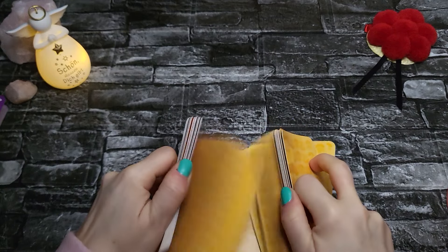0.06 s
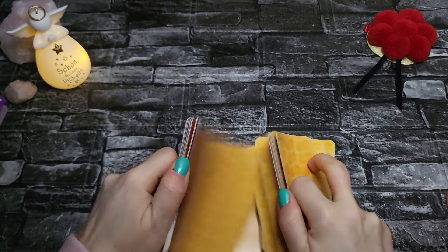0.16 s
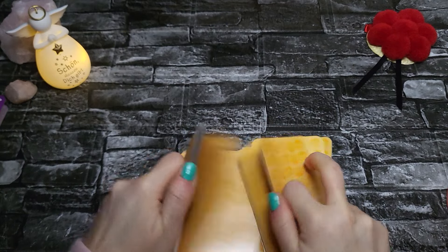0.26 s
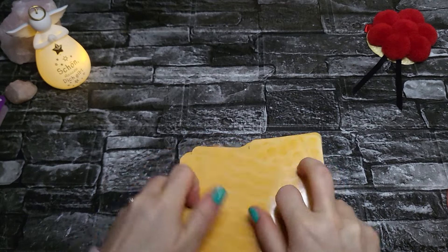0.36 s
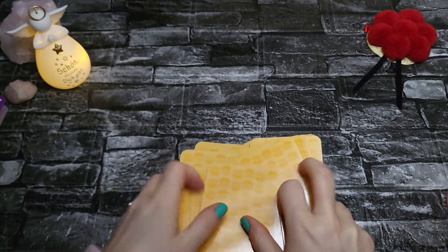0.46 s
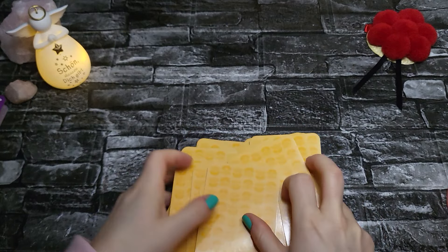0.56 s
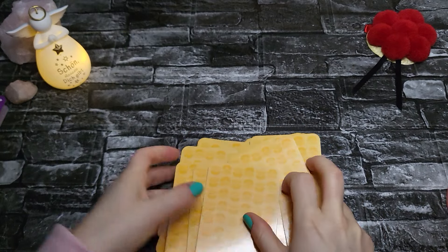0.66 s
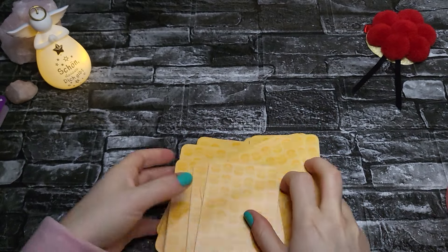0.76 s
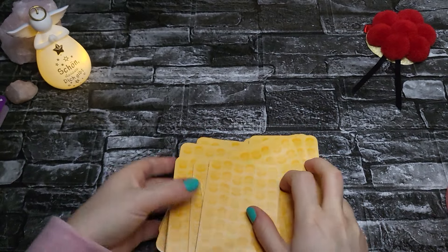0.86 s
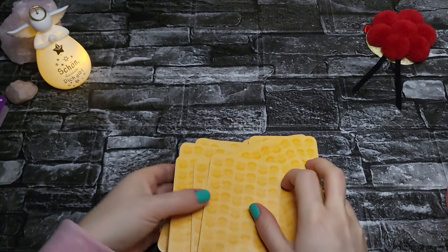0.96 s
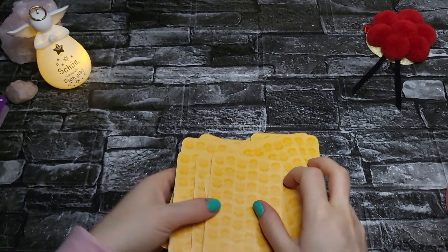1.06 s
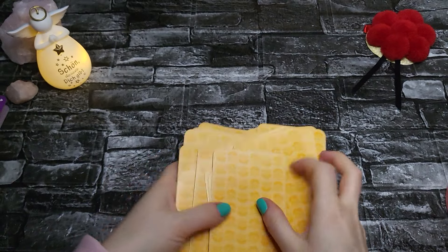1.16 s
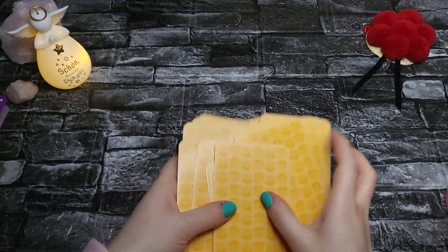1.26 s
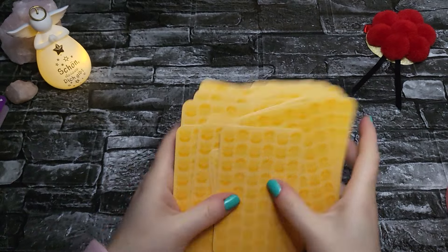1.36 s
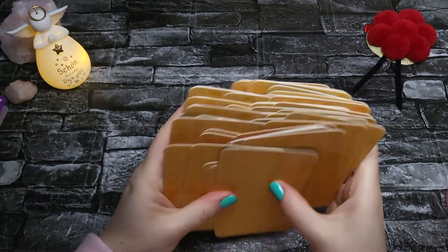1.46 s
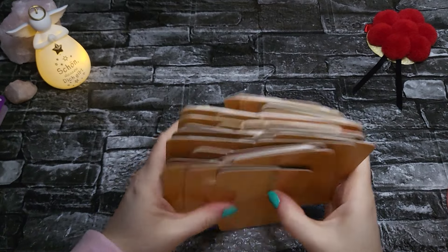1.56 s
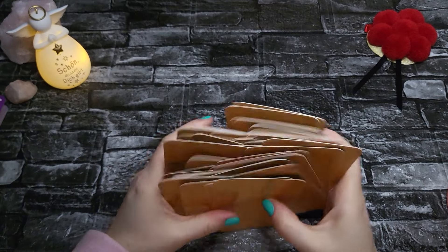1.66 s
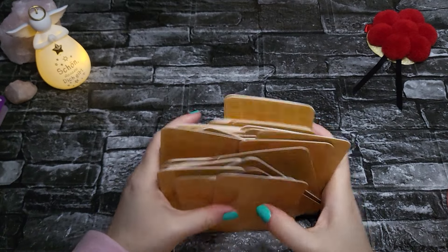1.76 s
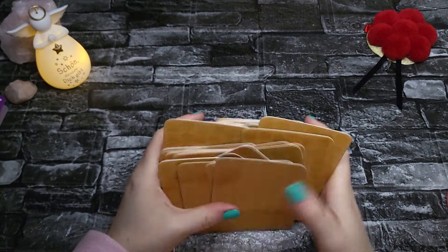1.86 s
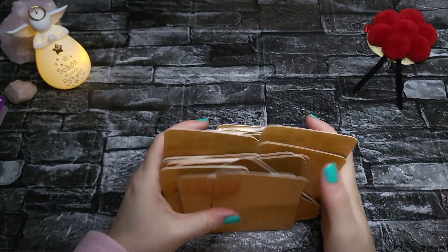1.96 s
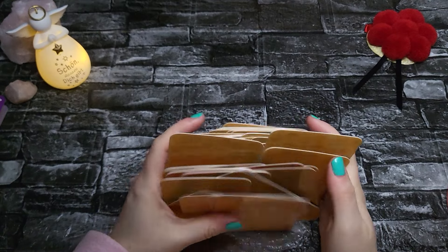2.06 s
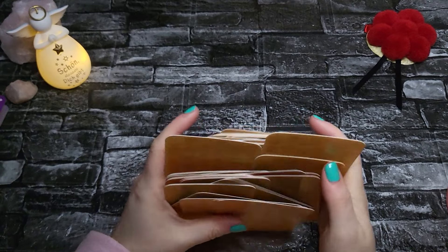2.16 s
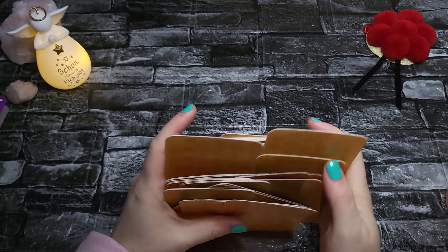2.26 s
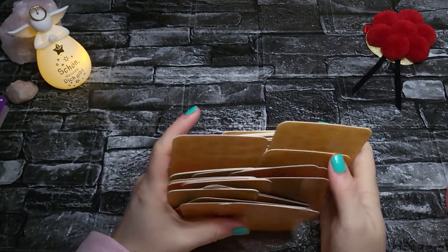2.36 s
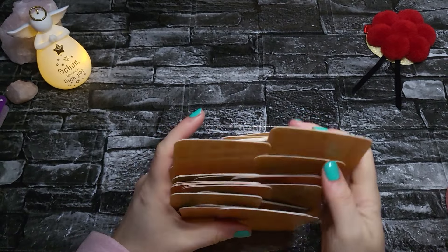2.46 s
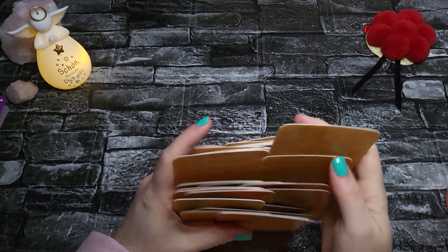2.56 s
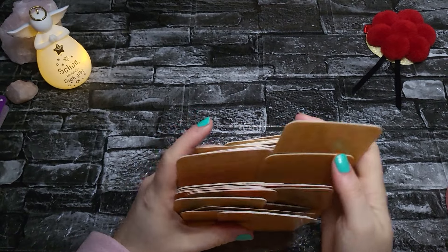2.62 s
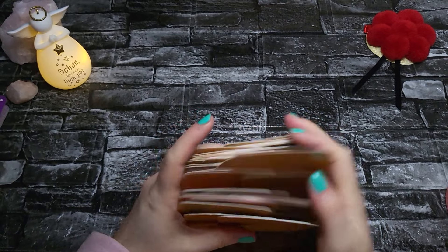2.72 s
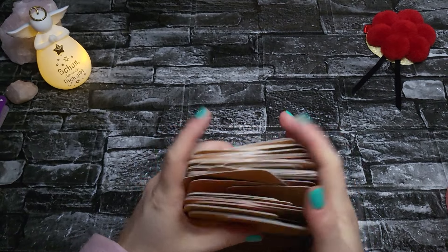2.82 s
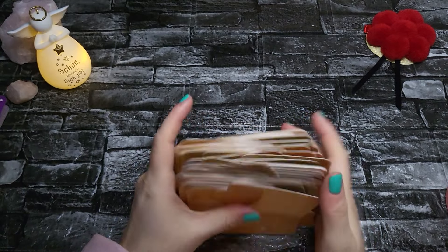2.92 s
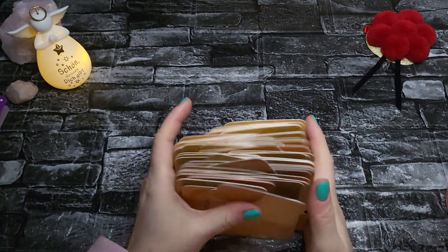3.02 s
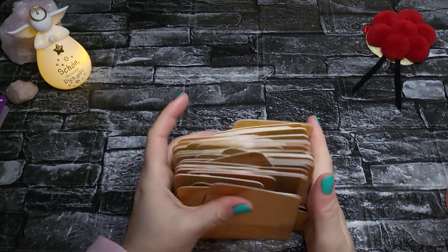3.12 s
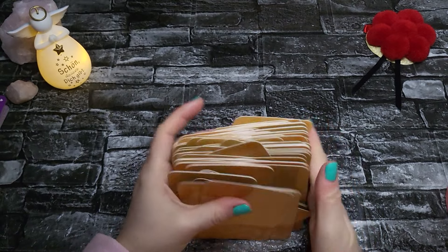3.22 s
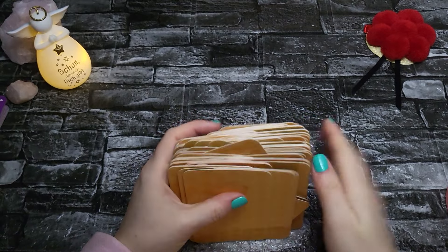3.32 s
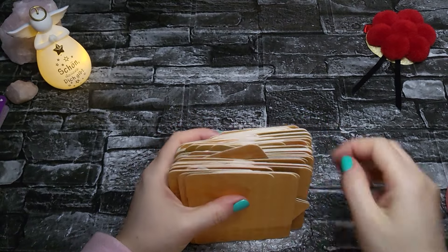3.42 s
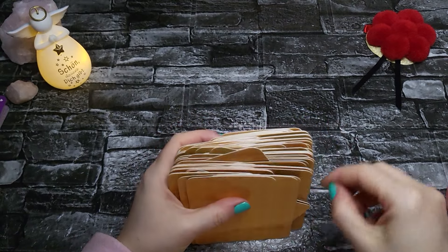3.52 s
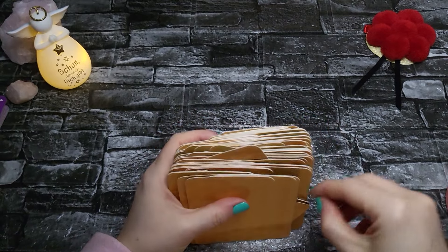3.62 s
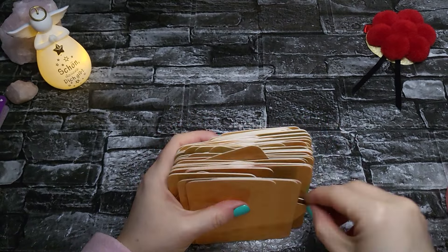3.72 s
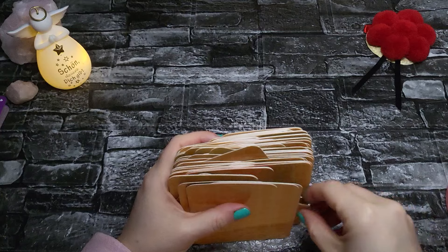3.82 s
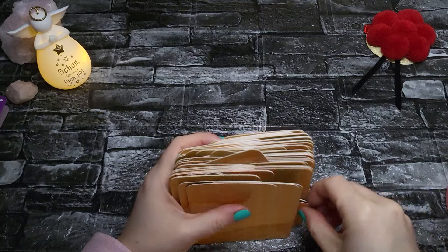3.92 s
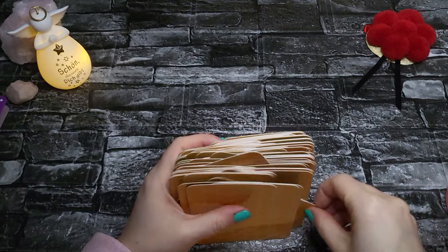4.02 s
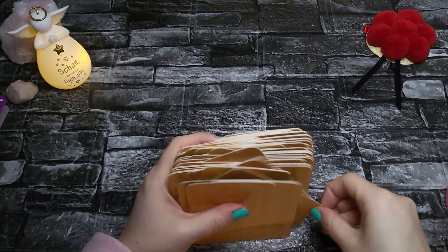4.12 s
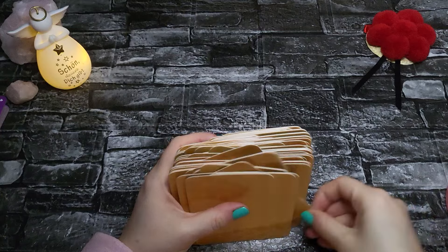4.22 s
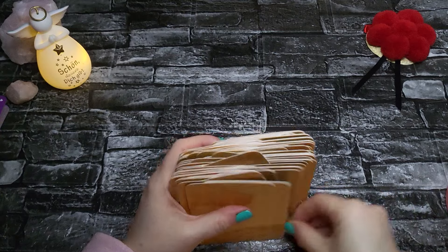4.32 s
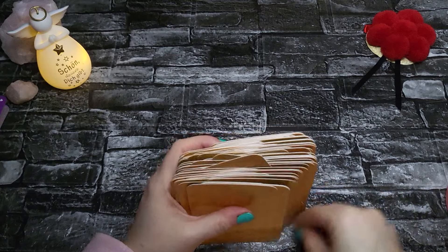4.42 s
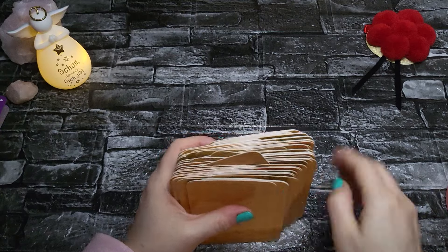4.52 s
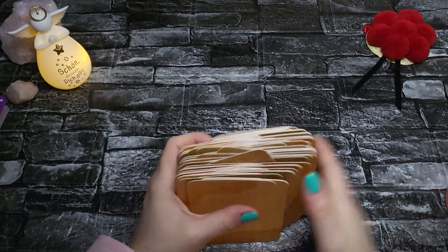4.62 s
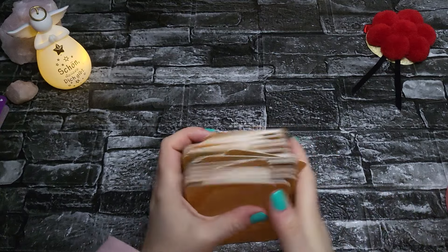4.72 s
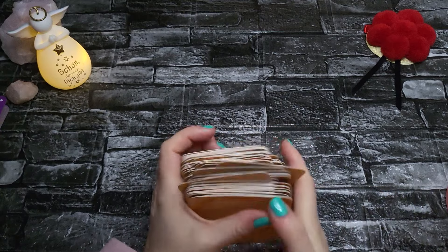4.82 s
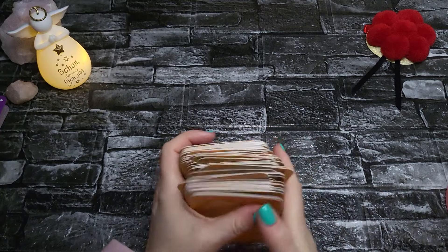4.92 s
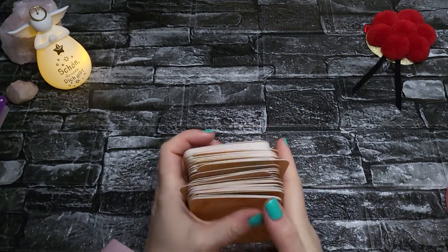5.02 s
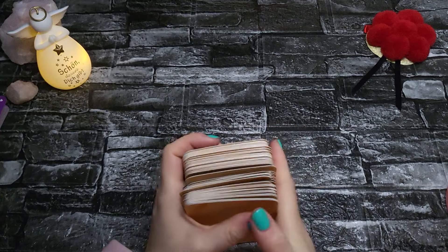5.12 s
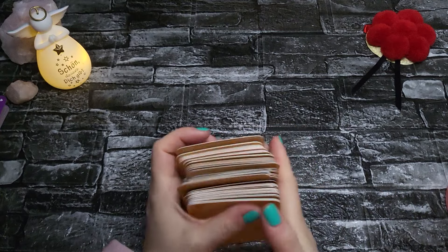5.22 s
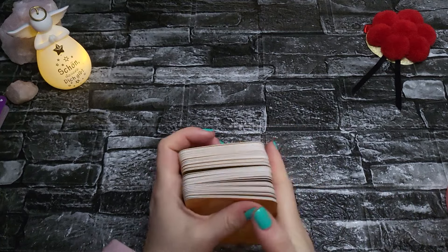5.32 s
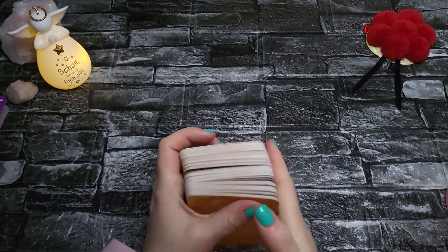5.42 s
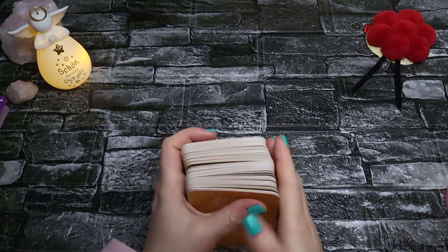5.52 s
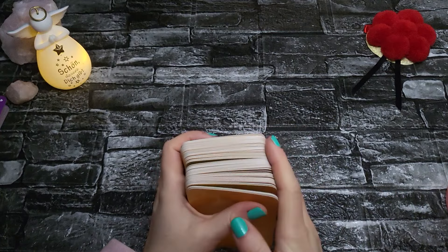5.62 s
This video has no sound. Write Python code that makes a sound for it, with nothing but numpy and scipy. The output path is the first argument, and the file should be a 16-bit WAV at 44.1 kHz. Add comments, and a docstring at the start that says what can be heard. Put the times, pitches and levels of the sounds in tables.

```python
"""A clattering riffle: two halves of a deck of large stiff cards fall together on a table, close up.
Hands then lift, slide and square the deck, with flicked edges, hiss, rumble, knocks, pops and faint squeaks.
Slaps and flicks are clumps of noise cracks with a blurred pitch; the hiss is grainy coloured noise.
Noise pushes ring the table's modes; pops and squeaks are resonated noise; echoes and room air surround it."""
import sys
import numpy as np
from scipy import signal
from scipy.io import wavfile
from scipy.ndimage import uniform_filter1d

SR = 44100
rng = np.random.default_rng(int(sys.argv[2]) if len(sys.argv) > 2 else 0)


def to_wav(sig):
    """Store sig (one row per channel, or 1-D mono) as 16-bit WAV at the path in sys.argv[1].

    Samples outside -1..1 are clipped; the rate is SR.
    """
    pcm = np.clip(np.atleast_2d(sig), -1, 1) * 32767
    pcm = np.round(pcm).astype(np.int16)
    wavfile.write(sys.argv[1], SR, pcm.T)  # frames by channels


N = 250443  # samples

# Cards slapping onto the pile: start_s, peak_db, pitch_hz
SLAPS = [(0.0158, -9.5, 2480), (0.0221, -11, 2500), (0.0416, -12.5, 4110), (0.066, -12.5, 6500),
         (0.0758, -11, 2067), (0.0894, -4, 2340), (0.093, -5, 2350), (0.1086, -12.5, 4750),
         (0.1256, -8, 7570), (0.133, -14.5, 2000), (0.1474, -7.5, 3520), (0.1603, -15, 2665),
         (0.1706, 0.5, 2414), (0.1747, -2.5, 1670), (0.188, -3.5, 2336), (0.1984, -11, 4260),
         (0.2117, -10, 2410), (0.2175, -10, 8000), (0.222, -1.5, 2400), (0.2365, -1, 2260),
         (0.2492, -7, 2200), (0.268, -2.5, 3290), (0.281, -11, 5000), (0.2875, -2, 3600), (0.297, -6, 4000),
         (0.3044, -3.5, 6680), (0.31, -6.5, 2550), (0.316, -11, 4210), (0.3333, -3, 2627),
         (0.3427, -5, 1440), (0.3504, -4.5, 1570), (0.3597, -4.5, 1930), (0.365, -4, 3437),
         (0.3899, -13, 3520), (0.3942, -11.5, 3620), (0.403, -21, 4000)]
# Runs of lighter cards: start_s, end_s, mean_peak_db, centre_pitch_hz, pitch_spread_octaves
LIGHT_RUNS = [(.003, .375, -15.5, 5500, 1.4), (1.665, 1.8, -28.5, 3400, .4)]
# Card edges flicking free: start_s, peak_db, pitch_hz, decay_ms
EDGE_FLICKS = [(0.438, -26.5, 2750, 2), (0.464, -31.5, 1920, 3), (0.6379, -33.5, 2930, 2.4),
               (0.813, -19.5, 2300, 1.4), (0.8463, -27.5, 1600, 2.7), (0.884, -36.5, 2680, 9.6),
               (1.27, -29.5, 2470, 7.1), (1.4419, -25.5, 4400, 4), (1.4707, -33, 2830, 2.4),
               (1.5276, -23.5, 3070, 4), (1.5518, -31, 6330, 3.5), (1.5664, -32, 1670, 3.2),
               (1.599, -26, 6060, 1.4), (1.646, -28, 2880, 5.5), (1.674, -30, 3400, 1.7),
               (1.6904, -21, 3340, 1.6), (1.707, -32, 2900, 2.5), (1.724, -26, 3480, 3),
               (1.7354, -24, 2420, 2.8), (1.7676, -35, 3100, 5.1), (1.817, -28, 3680, 2.6),
               (1.831, -30, 5460, 5.1), (1.8948, -26, 3180, 6), (2.121, -46, 3480, 2.2),
               (2.133, -39.5, 4000, 2.1), (2.344, -38.5, 1900, 3), (2.355, -35, 6100, 3.7),
               (2.476, -38, 1390, 2.3), (2.5604, -26, 6500, 1.6), (2.974, -36, 3400, 4.6),
               (3.186, -37.5, 2980, 13), (3.845, -50.5, 3000, 7.5), (4.156, -37, 3710, 5.9),
               (4.188, -39, 3220, 3.5), (4.315, -32.5, 3200, 1.4), (4.44, -36.5, 3830, 3.9),
               (4.4614, -36.5, 3700, 2.5), (4.699, -34, 3350, 5.6), (4.9155, -28, 2830, 0.87),
               (4.9216, -32.5, 3080, 1.4), (5.0798, -30, 3800, 6.9), (5.0914, -26, 2510, 4.1),
               (5.263, -24, 3500, 4.7), (5.272, -27, 2560, 6), (5.303, -20.5, 3200, 8.9),
               (5.3099, -13.5, 3600, 5.9), (5.326, -22, 2820, 7.4), (5.449, -31.5, 2740, 3.3),
               (5.484, -36.5, 2540, 1.6)]
# Colour of a slap or flick, relative: frequency_hz, level_db
SLAP_COLOUR = [(350, -28), (600, -6.5), (1570, -2), (2370, -1), (2760, -3.5), (7620, -3), (12800, -15),
               (16000, -29.5)]
# Colour of the sliding card faces, relative: frequency_hz, level_db
SLIDE_COLOUR = [(290, -25.5), (500, -0.5), (553, -3.5), (1110, -1), (1510, 1.5), (8330, -0.5), (13400, -17),
                (16000, -24.5)]
# Air between two bowed cards: centre_hz, width_hz, level_db (mean, relative to the hiss)
CARD_GAP = (2965, 1500, -15)
# Moves of the hands: top_s, rise_s (before the lead factor), fall_s (before any linger),
# hiss_db, slow_table_shaking_db, quick_table_shaking_db
HAND_MOVES = [(.33, 1, 0.085, -31.5, -61, -36), (.42, 0.046, 0.16, -46.5, -51.5, -48.5),
              (0.885, 0.14, 0.12, -55, -57, -71), (1.081, 0.2, 0.076, -57.5, -60, -90),
              (1.214, 0.11, 0.045, -54, -61, -57.5), (1.29, 0.0071, 0.071, -51, -64, -53.5),
              (1.39, 0.073, 0.052, -49, -48, -66), (1.482, 0.048, 0.044, -44, -54, -49.5),
              (1.601, 0.028, 0.046, -41, -66, -64), (1.681, 0.12, 0.072, -44, -40.5, -42.5),
              (1.745, 0.1, 0.062, -44.5, -30.5, -41), (1.898, 0.4, 0.099, -50.5, -50, -50.5),
              (2.137, 0.1, 0.13, -52.5, -75, -59.5), (2.355, 0.046, 0.11, -50, -53.5, -55.5),
              (2.568, 0.13, 0.059, -52, -50.5, -60), (2.81, 0.21, 0.11, -49, -57, -58),
              (2.99, 0.014, 0.12, -51.5, -48, -50), (3.06, 0.21, 0.062, -48.5, -67, -56),
              (3.33, 0.37, 0.11, -55, -53, -63), (3.53, 0.3, 0.081, -51.5, -88, -58),
              (4.191, 0.094, 0.13, -59, -68, -66.5), (4.328, 0.057, 0.16, -48.5, -51.5, -52),
              (4.716, 0.031, 0.094, -42, -47.5, -58.5), (4.801, 0.15, 0.057, -43.5, -50, -56.5),
              (4.93, 0.19, 0.24, -49.5, -50, -52.5), (5.09, 0.073, 0.086, -51, -77, -48),
              (5.268, 0.034, 0.022, -41, -57, -43), (5.313, 0.024, 0.035, -36.5, -27, -29),
              (5.454, 0.46, 0.083, -54.5, -48, -49.5)]
# Hands holding still: hiss_db, slow_table_shaking_db, quick_table_shaking_db
REST_LEVELS = (-68.5, -71.5, -72)
# Modes of the table top: frequency_hz, width_hz, drive_db
TABLE_MODES = [(56.4, 17, -5.5), (116, 41, -14), (157.6, 47, -14), (259, 48, -15.5), (318, 54.6, -14),
               (425, 62, -12.5), (512.5, 64, -16.5), (755, 370, -25)]
# The deck knocking on the table: start_s, peak_db
DECK_KNOCKS = [(0.842, -41), (1.625, -33.5), (1.673, -32), (1.699, -29), (1.735, -30.5), (2.358, -37.5),
               (2.556, -36), (4.313, -41.5), (4.915, -57), (5.259, -28.5), (5.272, -25.5), (5.305, -22.5),
               (5.324, -24)]
# A hollow scrape and pop inside the loose deck: start_s, peak_db, decay_ms
DECK_POPS = [(2.196, -42, 18), (2.224, -48, 4.4), (2.2357, -29.5, 1.4)]
# Resonances of the hollow deck: frequency_hz, width_hz, drive_db
HOLLOW_MODES = [(616, 210, 14), (924, 470, 18.5), (1570, 190, -4), (2910, 400, 4)]
# Rubbing tones while the deck is squared: start_s, end_s, pitch_hz, level_db
RUBBING_TONES = [(5.003, 5.206, 1320, -60), (5.333, 5.45, 1443, -58)]
# Decay of the echoes: frequency_hz, t60_s
ROOM_DECAY = [(200, 0.18), (1000, 0.11), (4000, 0.12), (12000, 0.12)]
# Colour of the still air, relative: frequency_hz, level_db
AIR_COLOUR = [(15, -12.5), (25, 10.5), (66, 5), (285, -6), (354, 0.5), (575, -19), (1190, -26), (3920, 0.5),
              (9570, -4.5), (16000, -30)]

AIR_DB = -67
FLICK_TOP = 9  # a flick is dull above this multiple of its pitch, or above SR / 4 if that is lower
SWELL_DB = 15  # drop away from a move's top per scaled rise or fall time, before rounding
ROUNDING = 0.15  # how much the top of a move is flattened
HISS_LEAD, TABLE_LEAD = 0.69, 0.86  # factors on the rise time: the table takes up a move more slowly
TABLE_LINGER_S = 0.016  # the table shakes on after a move
BAND_EDGE_HZ = 15900


def gain_of(db):
    """Turns decibels into an amplitude factor."""
    return 10 ** (np.asarray(db) / 20)


def evened(x):
    """Scales to rms 1."""
    return x / np.sqrt(np.mean(x ** 2) + 1e-20)


def peaked(db, x):
    """Scales to a peak level."""
    return gain_of(db) * x / abs(x).max()


def read(points, hz):
    """Reads a curve of points on a log-frequency axis."""
    f, value = np.transpose(points)
    return np.interp(np.log(hz + 1), np.log(f + 1), value)


def add(mix, s, sound):
    """Lays a sound into the mix at s seconds."""
    part = mix[round(s * SR):][:len(sound)]
    part += sound[:len(part)]


def coloured(x, points):
    """Shapes a sound with a causal minimum-phase filter of the given spectrum."""
    level_db = np.maximum(read(points, abs(np.fft.fftfreq(4096, 1 / SR))), -100)
    log_gain = np.log(gain_of(level_db))
    # the Hilbert transform of the log gain supplies the phase
    spectrum = np.exp(np.conj(signal.hilbert(log_gain)))
    taps = np.fft.ifft(spectrum).real[:2048]
    return signal.oaconvolve(x, taps)[:len(x)]


def resonate(x, hz, width):
    """Rings one decaying resonance with a peak gain of about 1."""
    pole = np.exp((2j * np.pi * hz - np.pi * width) / SR)
    return 2 * signal.lfilter([1 - abs(pole)], [1, -pole], x).real


def wander(seconds):
    """Drifts at random with rms 1, changing over the given time."""
    size = max(int(seconds * SR), 2)
    once = uniform_filter1d(rng.standard_normal(N), size=size)
    return evened(uniform_filter1d(once, size=size))


def cracks(ms, rise_ms):
    """A clump of tiny cracks as a card lands or slips along its edge."""
    t_ms = np.arange(2600) / SR * 1000
    sizes = gain_of(3.98 * rng.exponential(1, len(t_ms)).clip(0, 4))
    swell = (1 - np.exp(-t_ms / rise_ms)) * np.exp(-t_ms / ms)
    return rng.standard_normal(len(t_ms)) * sizes * swell


def snap(db, hz, drive, ring_db, blur):
    """Cracks take the colour of the card; the trapped air adds a blurred pitch."""
    ring = resonate(resonate(drive, hz, blur * hz), hz, blur * hz)
    crack = evened(coloured(drive, SLAP_COLOUR))
    return peaked(db, crack + gain_of(ring_db) * evened(ring))


def table_top(push):
    """The table rings with the same modes for every push; neighbouring modes swing in opposite phase."""
    out = 0
    for k, (hz, width, db) in enumerate(TABLE_MODES):
        broad = resonate(push, hz, 4.5 * width)
        out = out + (-1) ** k * gain_of(db) * resonate(broad, hz, width)
    return out


def blow(db):
    """A rough push, a few milliseconds long, sets the table ringing."""
    t = np.arange(9000) / SR
    push = rng.standard_normal(len(t)) * np.exp(-t / 0.0045)
    # the push is thinned below 150 Hz, so a knock has little deep boom
    thinned = signal.lfilter(*signal.butter(2, 150, "high", fs=SR), push)
    return peaked(db, table_top(thinned))


def moved(column, lead=HISS_LEAD, linger_s=0.):
    """Level of one layer over time: the moves add in power over the resting hands."""
    t = np.arange(0, N + 64, 64) / SR
    top, rise, fall, *levels_db = np.transpose(HAND_MOVES)[:, :, None]
    away = np.maximum((top - t) / (rise * lead), (t - top) / (fall + linger_s))
    away = away ** 2 / (away + ROUNDING)
    moves = gain_of(levels_db[column] - SWELL_DB * away)
    power = (moves ** 2).sum(0) + gain_of(REST_LEVELS[column]) ** 2
    return np.interp(np.arange(N) / SR, t, np.sqrt(power))


def light_run(start, end, db, hz, octaves, count=26):
    """Lighter cards fall unevenly spaced, each with its own strength and pitch."""
    chance = rng.random((count, 3))
    s = start + (end - start) * (np.arange(count) + chance[:, 0]) / count
    peak_db = db + 8.0 * (chance[:, 1] - .5)
    pitch_hz = hz * 2 ** (octaves * (chance[:, 2] - .5))
    return [(*card, 1.1) for card in zip(s, peak_db, pitch_hz)]  # decay 1.1 ms


def flicks():
    """Light cards and card edges crack, dulled in step with their pitch."""
    out = np.zeros(N)
    rows = list(EDGE_FLICKS)
    for run in LIGHT_RUNS:
        rows += light_run(*run)
    for s, db, hz, ms in rows:
        dull = signal.butter(2, min(FLICK_TOP * hz, SR / 4), fs=SR)
        drive = signal.lfilter(*dull, cracks(ms, rise_ms=.35))
        add(out, s, snap(db, hz, drive, ring_db=3.5, blur=.6))
    return out


def slaps():
    """Each card cracks as it lands on the pile and knocks the table below."""
    out = np.zeros(N)
    for s, db, hz in SLAPS:
        add(out, s, snap(db, hz, cracks(2.5, rise_ms=.45), ring_db=-4, blur=.3))
        add(out, s, blow(db - 14.5))
    return out


def sliding():
    """Card faces slip in fine grains and stutter; the gap between cards opens and shuts."""
    grains = rng.standard_normal(N) * gain_of(2.4 * rng.exponential(1, N).clip(0, 5))
    grains *= gain_of(2.0 * wander(.004) + 1.1 * wander(.012))
    hz, width, gap_db = CARD_GAP
    ring = resonate(resonate(grains, hz, width), hz, width)
    gap = evened(ring) * gain_of(gap_db + 3.0 * wander(0.057))
    # small edges catch now and then, about 70 a second: short puffs of cracks
    catches = (rng.random(N) < 70 / SR) * gain_of(4.0 * rng.exponential(1, N).clip(0, 3))
    puff_level = signal.lfilter([1], [1, -np.exp(-1 / (.0012 * SR))], catches)
    puffs = puff_level * rng.standard_normal(N)
    ticks = gain_of(-15.0) * evened(coloured(puffs, SLAP_COLOUR))
    return moved(column=0) * (evened(coloured(grains, SLIDE_COLOUR)) + gap + ticks)


def table():
    """Hands and deck shake the top in lumps, slowly and quickly; the knocks ring over that."""
    lumps = rng.standard_normal(N) * gain_of(2.8 * wander(.008))
    out = np.zeros(N)
    for column, kind in ((1, "low"), (2, "high")):
        split = signal.butter(4, 190, kind, fs=SR, output="sos")
        push = signal.sosfilt(split, lumps)
        level = moved(column, TABLE_LEAD, TABLE_LINGER_S)
        out += table_top(level * push) / np.std(table_top(push))
    for s, db in DECK_KNOCKS:
        add(out, s, blow(db))
    return out


def pops():
    """Cracks excite the hollow resonances inside the loose deck."""
    out = np.zeros(N)
    for s, db, ms in DECK_POPS:
        drive = cracks(ms, rise_ms=0.17)
        hollow = 0
        for hz, width, mode_db in HOLLOW_MODES:
            hollow = hollow + gain_of(mode_db) * resonate(resonate(drive, hz, width), hz, width)
        add(out, s, peaked(db, hollow))
    return out


def squeak():
    """Uneven slips rub through one narrow resonance at a time."""
    slips = rng.standard_normal(N) * gain_of(3.0 * wander(.015))
    out = np.zeros(N)
    for start, end, hz, db in RUBBING_TONES:
        progress = np.clip((np.arange(N) / SR - start) / (end - start), 0, 1)
        # the floor at zero keeps the root real
        arch = np.maximum(np.sin(np.pi * progress), 0) ** .5
        tone = resonate(resonate(slips, hz, 110), hz, 110)
        out += gain_of(db) * arch * evened(tone)
    return out


def room(x):
    """Sparse echoes of random sign, each band dying at its own speed."""
    taps = np.zeros(SR // 2)
    at = np.arange(80, SR // 2 - 20, 20)
    taps[at + rng.integers(0, 20, len(at))] = rng.choice([-1., 1.], len(at))
    hz, t, bands = signal.stft(taps, SR, nperseg=256)
    decay = gain_of(-60 * t / read(ROOM_DECAY, hz)[:, None])
    tail = signal.istft(bands * decay, SR, nperseg=256)[1]
    return signal.fftconvolve(x, tail / np.linalg.norm(tail))[:N]


def still_air():
    """The still air of the room is steady coloured noise."""
    return gain_of(AIR_DB) * evened(coloured(rng.standard_normal(N), AIR_COLOUR))


def scene():
    """Cards and table, their echoes and the still air, in one channel."""
    near = flicks() + slaps() + sliding() + table() + pops() + squeak()
    return (near + gain_of(-12) * room(near) + still_air())[None]


def record(dry):
    """The microphone loses the deepest bass, its input clips any louder peaks, then the band is limited."""
    thin = signal.sosfilt(signal.butter(4, 45, "high", fs=SR, output="sos"), dry)
    held = np.clip(thin, -.95, .95)
    band = signal.firwin(511, BAND_EDGE_HZ, window=("kaiser", 11), fs=SR)
    return signal.oaconvolve(held, band[None], "same")


dry = scene()
out = record(dry)
to_wav(out)
```